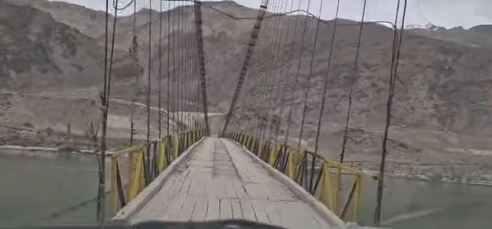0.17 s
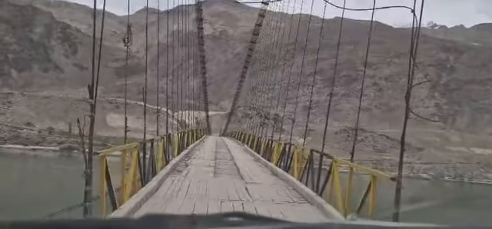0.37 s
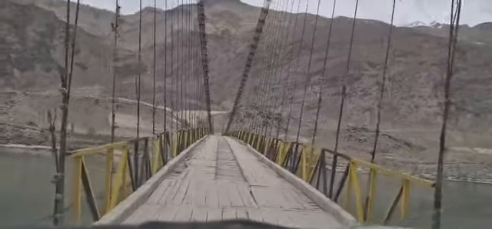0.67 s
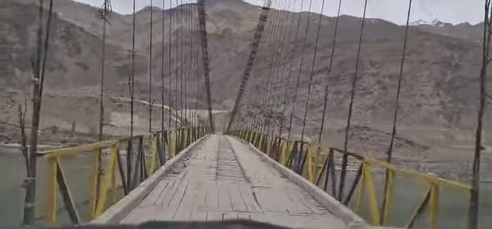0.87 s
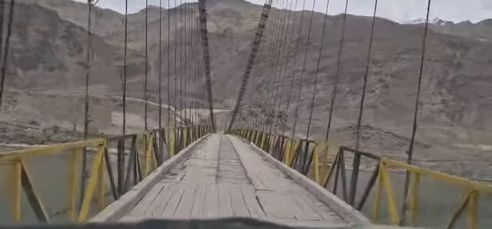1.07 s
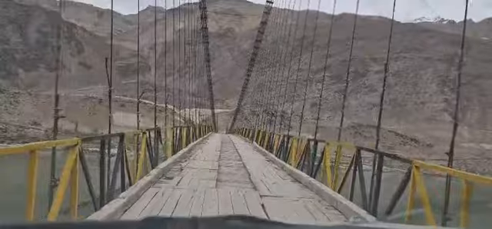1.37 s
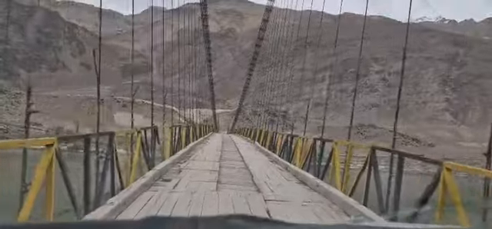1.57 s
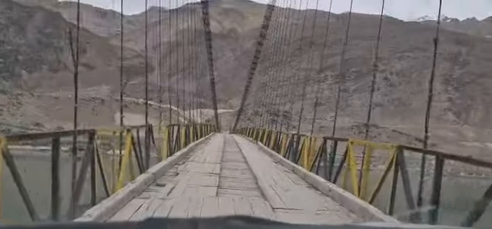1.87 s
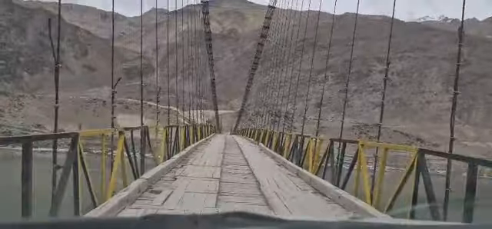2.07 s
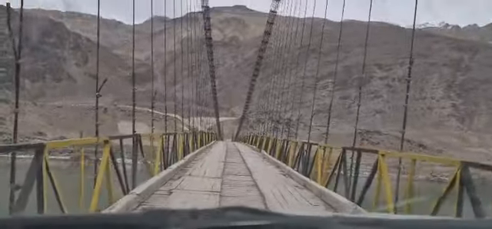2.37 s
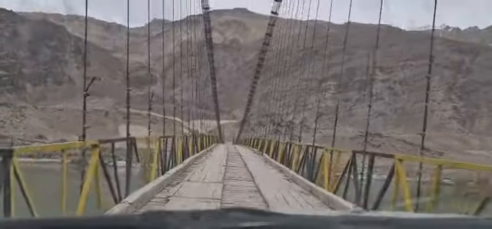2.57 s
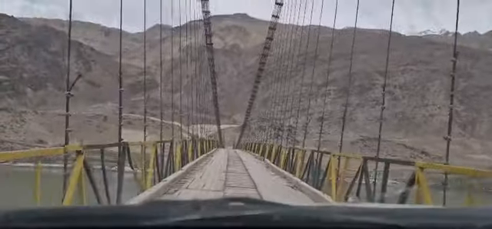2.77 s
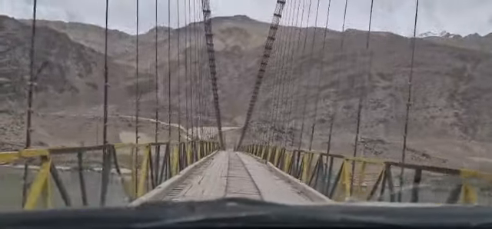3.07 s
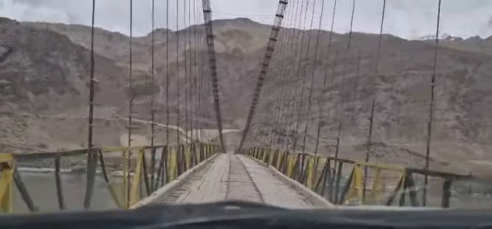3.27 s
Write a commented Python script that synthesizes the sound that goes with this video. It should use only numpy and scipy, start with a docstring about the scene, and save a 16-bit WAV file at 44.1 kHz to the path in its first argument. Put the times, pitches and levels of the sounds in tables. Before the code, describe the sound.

Car interior crossing a plank bridge: deep tyre rumble, engine drone, hollow board bumps and rattles

```python
"""A car creeps over a plank suspension bridge, heard from inside the cabin.
All along, the engine drones low (sines) and the tyres rumble on the boards (shaped noise).
At first an airy hiss is strong and the trim squeaks (gliding tones); then planks knock and thump (ringing tones).
Midway the hiss fades, then a cluster of thumps and bumps comes with a rattle (noise clacks).
After a calmer stretch come more jolts, rattles and one deep boom; small ticks and creaks (noise) dot the ride."""
import sys
import numpy as np
from scipy import signal
from scipy.fft import rfft, irfft
from scipy.io import wavfile

SR = 44100
rng = np.random.default_rng(int(sys.argv[2]) if len(sys.argv) > 2 else 0)


def to_wav(sig):
    """Store sig (one row per channel, or 1-D mono) as 16-bit WAV at the path in sys.argv[1].

    Samples outside -1..1 are clipped; the rate is SR.
    """
    pcm = np.clip(np.atleast_2d(sig), -1, 1) * 32767
    pcm = np.round(pcm).astype(np.int16)
    wavfile.write(sys.argv[1], SR, pcm.T)  # frames by channels


N = 150822
TIME = np.arange(N) / SR

# In every noise colour below, levels are relative: the finished noise is scaled to rms 1.
# engine firing rate: t/s, f/Hz
FIRING_RATE = [(0, 36.61), (1.85, 36.99), (2.88, 36.65), (3.42, 37.03)]
# drone at the firing rate itself: t/s, level/dB
DRONE_LEVEL = [(0, -23.5), (.1, -30), (.24, -20), (.34, -34), (.52, -23), (.64, -24.5), (.8, -31.5),
               (.93, -22), (1.01, -29), (1.1, -22), (1.3, -34.5), (1.39, -23.5), (1.55, -24.5), (1.7, -24),
               (1.92, -25.5), (2.14, -20.5), (2.22, -28.5), (2.44, -21), (2.67, -24), (2.9, -26.5),
               (3.1, -17), (3.42, -30)]
DRONE_WAVER_DB, DRONE_WAVER_RAD = 2, 0.44
# engine overtones: multiple of the firing rate, level/dB, left minus right/dB
ENGINE_ORDERS = [(2, -35.5, 0), (3, -38, -4), (4, -47.5, 5), (5, -43.5, -1), (6, -47, -0.5),
                 (7, -57.5, -16), (8, -51.5, -3), (9, -48, 5.5), (10, -48.5, 7.5), (11, -57, -2),
                 (12, -62, 2), (13, -60, -10)]
ORDER_WAVER_DB, ORDER_WAVER_RAD = 3, 0.52
# colour of the deep tyre rumble: f/Hz, level/dB
RUMBLE_COLOUR = [(10, -46), (20, -19), (30, -15), (42, 0), (51, 3), (62, 3), (76, 5.5), (105, -2),
                 (130, -9), (200, -33.5), (400, -50), (1000, -85.5)]
# how loud the rumble is: t/s, level/dB
RUMBLE_LEVEL = [(0, -22), (.15, -22), (.3, -26.5), (.5, -25), (.72, -38), (.85, -28), (1.1, -27),
                (1.33, -22.5), (1.5, -30.5), (1.83, -27.5), (1.93, -21), (2.03, -24.5), (2.25, -28),
                (2.75, -29), (2.96, -24.5), (3.17, -20), (3.28, -29.5), (3.42, -22.5)]
# colour of the hollow roll of the deck: f/Hz, level/dB
DECK_COLOUR = [(60, -17.5), (110, -3.5), (145, 3), (180, -0.5), (210, -3), (243, 0), (275, -5), (320, -5),
               (380, -7.5), (440, -9.5), (520, -14.5), (760, -22), (1000, -30.5), (2000, -71)]
# how loud the deck is: t/s, level/dB
DECK_LEVEL = [(0, -34), (.3, -33.5), (.7, -36), (.85, -33.5), (1.1, -34.5), (1.3, -34.5), (1.5, -34),
              (1.85, -34.5), (1.89, -30), (1.95, -31), (2.07, -33.5), (2.17, -34.5), (2.45, -36),
              (2.6, -32), (2.85, -36.5), (2.9, -30), (3.0, -28), (3.06, -33), (3.25, -34.5), (3.42, -32.5)]
# colour of tyres scrubbing on dry wood: f/Hz, level/dB
SCRUB_COLOUR = [(200, -59), (500, 0.5), (760, 3.5), (950, -0.5), (1300, 2.5), (1700, -5.5), (2400, -7.5),
                (3000, -10.5), (4200, -13), (7000, -22.5), (10000, -37.5)]
# how loud the scrub is: t/s, level/dB
SCRUB_LEVEL = [(0, -45.5), (.9, -45.5), (1.2, -47.5), (1.6, -48.5), (1.95, -46), (2.25, -48), (2.85, -47),
               (2.96, -45), (3.15, -46.5), (3.42, -48.5)]
# wheels dropping off uneven planks: t/s, level/dB, body pitch f/Hz
THUMPS = [(0.811, -18.5, 67), (1.222, -23, 75), (1.291, -24, 89), (1.733, -17.5, 70.6), (1.888, -13, 75),
          (1.927, -11, 70), (2.954, -13.5, 79), (3.116, -18, 69), (3.168, -17, 74.5)]
# ways the car body rings: multiple of its pitch, level added to the thump/dB, time to fall 60 dB/s
BODY_MODES = [(1, 2.5, 0.15), (1.5, -12.5, 0.21), (2.252, -16, 0.12)]
THUMP_RISE_S = 0.0033
# one deep cabin boom: t/s, level/dB, f/Hz, rise/s, time to fall 60 dB/s
BOOM = (2.995, -10, 35, .03, .3)
# boards bumping on their beams: t/s, level/dB, pitch f/Hz
BUMPS = [(.661, -24.5, 190), (0.799, -24, 237), (1.065, -30, 148), (1.225, -23.5, 193), (1.306, -23.5, 190),
         (1.876, -21, 224), (1.901, -16, 152.5), (1.91, -17.5, 235), (2.051, -25, 204), (2.528, -28, 159),
         (2.647, -27.5, 155), (2.892, -22.5, 235), (2.918, -22, 200), (2.965, -24, 239), (3.001, -22, 215),
         (3.051, -27, 240), (3.12, -26, 189), (3.149, -27, 136)]
# ways a board rings: multiple of its pitch, level added to the bump/dB, time to fall 60 dB/s
BOARD_MODES = [(0.999, -1.5, 0.12), (1.421, -7.5, 0.11), (1.85, -12, 0.039), (3.1, -27.5, 0.057)]
BUMP_RISE_S = 0.004
# loose planks knocking: t/s, level/dB, time for the clack to fall 60 dB/s, treble limit f/Hz
KNOCKS = [(.7965, -23, .052, 6000), (1.292, -33, .08, 1900), (1.8085, -33.5, .06, 1800),
          (2.921, -41, .1, 2400)]
# colour of a plank's clack: f/Hz, level/dB
PLANK_COLOUR = [(100, -4), (220, 6), (400, 2), (600, 0), (750, 0), (1000, 0), (1350, 1), (1700, -5),
                (2400, -6), (3100, -9), (3600, -18), (4300, -13), (5000, -17), (7500, -22), (10000, -37),
                (16000, -40)]
# woody ring of a knocked plank: f/Hz, level added to the knock/dB, time to fall 60 dB/s
PLANK_RING = [(596, -10, 0.015), (762, -10, 0.042), (1345, -12, 0.069)]
KNOCK_RISE_S, KNOCK_HOLD_S = 0.001, 0.005
# fittings rattling after a jolt: t/s, length/s, level/dB
RATTLES = [(1.887, .19, -45.5), (2.921, .035, -38), (2.97, .06, -43), (3.058, .12, -46)]
# colour of a rattle: f/Hz, level/dB
RATTLE_COLOUR = [(300, -11), (700, 7.5), (1300, 4), (1650, 2), (2150, 0.5), (3000, -11.5), (4500, -6),
                 (7500, -16), (10000, -32.5)]
RATTLES_PER_S, RATTLE_T60_S, RATTLE_SETTLE_DB, RATTLE_SPREAD_DB = 70, 0.035, -4, 3
# trim and grit ticking: t/s, level/dB, centre f/Hz, width/octaves, left minus right/dB
TICKS = [(.492, -52, 9000, .5, -2), (.661, -42, 1890, 1.3, 0), (0.862, -38.5, 6500, 0.3, -2),
         (0.887, -47, 6660, 0.29, -2), (.946, -40, 7000, 0.4, -2), (.948, -45, 13000, .3, -4),
         (1.425, -47, 8400, 0.31, -1), (1.895, -52, 5500, 0.42, -1), (1.926, -44.5, 4700, 0.5, 0),
         (2.004, -47, 3800, 0.58, -5), (2.494, -46, 4570, 0.44, 3), (2.547, -46.5, 4800, 0.47, 1),
         (2.781, -39.5, 2700, 0.74, -2), (2.831, -57, 6500, 1.2, 4), (2.922, -42, 2000, 0.23, 7),
         (2.928, -47, 4800, 0.53, -2), (3.113, -50, 4960, 0.48, 1), (3.132, -49, 5460, 0.35, -4),
         (3.163, -42.5, 2900, 0.84, 1)]
TICK_RISE_S, TICK_T60_S = 0.00091, 0.032
# trim squeaks: t/s, length/s, level/dB, start f/Hz, end f/Hz
SQUEAKS = [(0.071, 0.044, -57, 6750, 6500), (0.274, 0.038, -56, 4790, 4720),
           (0.3, 0.023, -53.5, 4480, 4380), (0.322, 0.03, -48, 4250, 4200),
           (3.016, 0.072, -56.5, 6120, 6020), (3.127, 0.022, -54, 4190, 4160)]
SQUEAK_JITTER, SQUEAK_JITTER_HZ = 0.028, 700  # rms share of the pitch, speed of the wander
# colour of faint trim creaks: f/Hz, level/dB
CREAK_COLOUR = [(1200, -19), (2500, -11.5), (4400, 0), (6500, -2), (8300, -3), (10000, -21), (16000, -19)]
CREAK_DB, CREAKS_PER_S, CREAK_SPREAD_DB, CREAK_T60_S = -8.5, 46, 0.5, 0.078  # CREAK_DB: against the hiss
# colour of the airy hiss: f/Hz, level/dB
HISS_COLOUR = [(1000, 4.5), (2400, 2), (3200, 0.5), (3800, -3), (4300, 4), (4900, -3.5), (6200, -2.5),
               (7000, -7), (8000, -4.5), (9200, -28), (10500, -37.5), (16000, -31.5)]
# how loud the hiss is: t/s, level/dB
HISS_LEVEL = [(0, -47), (.2, -47.5), (.8, -46.5), (1.0, -47.5), (1.15, -46), (1.65, -53.5), (2.05, -56),
              (2.35, -59), (2.87, -56.5), (3.0, -57), (3.13, -51), (3.23, -57.5), (3.42, -54.5)]
# colour of the top of the hiss: f/Hz, level/dB
FIZZ_COLOUR = [(5000, 1), (7800, 10.5), (9000, 1), (10200, -3.5), (11800, 4.5), (14000, 2), (16000, -1)]
# how loud that top is: t/s, level/dB
FIZZ_LEVEL = [(0, -48.5), (.15, -58), (.5, -55.5), (.85, -55.5), (1.05, -57.5), (1.15, -55.5), (1.3, -60.5),
              (1.5, -58.5), (1.8, -66), (1.87, -75), (1.94, -66), (2.06, -86), (2.4, -82), (2.85, -71.5),
              (2.95, -60.5), (3.07, -66), (3.17, -67), (3.3, -71), (3.42, -68)]
# how alike left and right are in the cabin: f/Hz, likeness (held between -0.999 and 0.999 in use)
LIKENESS = [(60, 1.5), (160, 4.5), (330, 0.5), (470, -0.5), (620, 0.03), (790, 0.5), (950, -0.29),
            (1150, -0.76), (1480, -0.4), (1750, -0.32), (2200, 0.38), (2900, -0.38), (4500, 0), (15000, 0)]
# left-right balance in the cabin: f/Hz, left minus right/dB
BALANCE = [(60, 0.5), (160, 3), (370, 5.5), (480, -2), (800, 0.5), (1300, 2.5), (1650, -2.5), (3000, -0.5),
           (4000, -3), (5700, -5.5), (7000, -1.5), (8200, 1.5), (9400, 5), (10500, -3.5), (12500, 0),
           (16000, -4)]
EDGE_HZ = 15850


def amp(db):
    """Turns decibels into a gain."""
    return 10 ** (np.asarray(db) / 20)


def unit(x):
    """Scales a sound to rms 1."""
    return x / np.sqrt(np.mean(x ** 2) + 1e-20)


def curve(points):
    """Joins timed points into a control curve over the whole scene."""
    return np.interp(TIME, *np.transpose(points))


def at_hz(points, hz):
    """Reads a table between its points on a log-frequency axis."""
    f, value = np.transpose(points)
    return np.interp(np.log(hz + 1), np.log(f + 1), value)


def pan(db):
    """Gives left and right gains that differ by db; above zero leans left."""
    return amp(np.array([[.5], [-.5]]) * db)


def add(mix, s, sound):
    """Adds a sound to the mix at time s, cut off at the end of the scene."""
    part = mix[:, max(round(s * SR), 0):][:, :sound.shape[-1]]
    part += sound[..., :part.shape[1]]


def drift(rate_hz):
    """A random wander of rms 1, with little movement faster than rate_hz."""
    hz = np.fft.rfftfreq(N, 1 / SR)
    keep = (hz > 0) / (1 + (hz / rate_hz) ** 4)
    return unit(irfft(rfft(rng.standard_normal(N)) * keep, N))


def cabin_noise(colour, size=N):
    """Coloured noise, spread left to right as the cabin does at each frequency."""
    hz = np.fft.rfftfreq(size, 1 / SR)
    common, apart = rfft(rng.standard_normal((2, size)))
    same = np.clip(at_hz(LIKENESS, hz), -.999, .999)
    # the apart noise has opposite signs left and right
    pair = np.sqrt(1 + same) * common + np.array([[1], [-1]]) * np.sqrt(1 - same) * apart
    gain = amp(at_hz(colour, hz)) * pan(at_hz(BALANCE, hz))
    return unit(irfft(pair * gain, size))


def strike(t, rise, t60):
    """The loudness shape of a hit: quick rise, then a fall of 60 dB in t60 seconds."""
    fall = np.exp(-np.log(1000) * np.maximum(t - rise, 0) / t60)
    return np.minimum(t / rise, 1) * fall


def engine():
    """A deep drone at the firing rate and its overtones, wavering as the car rocks."""
    turn = 2 * np.pi * np.cumsum(curve(FIRING_RATE)) / SR
    drone_level = amp(curve(DRONE_LEVEL) + DRONE_WAVER_DB * drift(rate_hz=16))
    drone = drone_level * np.sin(turn + DRONE_WAVER_RAD * drift(rate_hz=6.2))
    out = np.array([drone, drone])
    for order, db, side_db in ENGINE_ORDERS:
        start = 2 * np.pi * rng.random()
        phase = order * turn + start + ORDER_WAVER_RAD * drift(rate_hz=3.07)
        level = amp(db + ORDER_WAVER_DB * drift(rate_hz=4.4))
        out += pan(side_db) * level * np.sin(phase)
    return np.sqrt(2) * out  # makes the levels rms rather than peak


def tyres(judder_db=1.07, deck_db=1.35, grain_db=0.37):
    """Tyres excite deep rumble, hollow deck and dry scrub, all juddering together over the boards."""
    judder = drift(rate_hz=26.6)
    rumble = cabin_noise(RUMBLE_COLOUR) * amp(curve(RUMBLE_LEVEL) + judder_db * judder)
    deck = cabin_noise(DECK_COLOUR) * amp(curve(DECK_LEVEL) + deck_db * judder)
    scrub = cabin_noise(SCRUB_COLOUR) * amp(curve(SCRUB_LEVEL) + grain_db * judder)
    return rumble + deck + scrub


def thumps():
    """Each drop of a wheel rings the low modes of the body; one separate deep cabin boom swells late."""
    out, t = np.zeros((2, N)), np.arange(SR // 2) / SR
    for s, db, pitch_hz in THUMPS:
        for ratio, mode_db, t60 in BODY_MODES:
            hz = pitch_hz * ratio
            ring = strike(t, THUMP_RISE_S, t60) * np.sin(2 * np.pi * hz * t)
            add(out, s, amp(db + mode_db) * pan(at_hz(BALANCE, hz)) * ring)
    s, db, hz, rise, t60 = BOOM
    add(out, s, amp(db) * strike(t, rise, t60) * np.sin(2 * np.pi * hz * t))
    return out


def bumps():
    """Boards flex under a tyre and slap their beams: short, hollow, each at its own pitch."""
    out, t = np.zeros((2, N)), np.arange(SR // 4) / SR
    for s, db, pitch_hz in BUMPS:
        for ratio, mode_db, t60 in BOARD_MODES:
            hz = pitch_hz * ratio
            wave = np.sin(2 * np.pi * (hz * t + rng.random()))
            ring = strike(t, BUMP_RISE_S, t60) * wave
            add(out, s, amp(db + mode_db) * pan(at_hz(BALANCE, hz)) * ring)
    return out


def knocks():
    """Loose boards give a dry clack of noise plus a short woody ring; soft clacks are duller."""
    out, t = np.zeros((2, N)), np.arange(SR // 4) / SR
    ring = np.zeros(len(t))
    for hz, mode_db, ring_t60 in PLANK_RING:
        ring += amp(mode_db) * strike(t, KNOCK_RISE_S, ring_t60) * np.sin(2 * np.pi * hz * t)
    for s, db, t60, top_hz in KNOCKS:
        fall = amp(-60 * np.maximum(t - KNOCK_HOLD_S, 0) / t60)
        shape = np.minimum(t / KNOCK_RISE_S, 1) * fall
        low_pass = signal.butter(2, top_hz, fs=SR)
        clack = signal.lfilter(*low_pass, cabin_noise(PLANK_COLOUR, size=len(t)))
        add(out, s, amp(db) * (shape * clack + ring))
    return out


def rattles():
    """After each big jolt loose fittings chatter in uneven little clacks and settle."""
    out, t = np.zeros((2, N)), np.arange(SR // 20) / SR
    for s, length, db in RATTLES:
        delay = 0
        while delay < length:
            clack = strike(t, TICK_RISE_S, RATTLE_T60_S) * cabin_noise(RATTLE_COLOUR, size=len(t))
            settle_db = RATTLE_SETTLE_DB * delay / length
            uneven_db = RATTLE_SPREAD_DB * rng.uniform(-1.1, 1)
            add(out, s + delay, amp(db + settle_db + uneven_db) * clack)
            delay += (.5 + rng.random()) / RATTLES_PER_S
    return out


def ticks():
    """Trim and grit give small ticks: bursts of noise around one pitch, smeared briefly by the cabin."""
    out, t = np.zeros((2, N)), np.arange(SR // 10) / SR
    hz = np.fft.rfftfreq(len(t), 1 / SR) + 1  # +1 avoids log of zero
    for s, db, centre_hz, octaves, side_db in TICKS:
        colour = np.exp(-.5 * (np.log2(hz / centre_hz) / octaves) ** 2)
        noise = rfft(rng.standard_normal((2, len(t))))
        burst = unit(irfft(noise * colour, len(t)))
        add(out, s, amp(db) * pan(side_db) * strike(t, TICK_RISE_S, TICK_T60_S) * burst)
    return out


def squeaks(side_db=-2):
    """Trim sticks and slips: short falling tones of unsteady pitch that swell and fade."""
    out = np.zeros((2, N))
    for s, length, db, start_hz, end_hz in SQUEAKS:
        u = np.arange(0, 1, 1 / (length * SR))  # progress from 0 to 1
        jitter = SQUEAK_JITTER * drift(rate_hz=SQUEAK_JITTER_HZ)[:len(u)]
        hz = (start_hz + (end_hz - start_hz) * u) * (1 + jitter)
        tone = np.sin(np.pi * u) * np.sin(2 * np.pi * np.cumsum(hz) / SR)
        add(out, s, np.sqrt(2) * amp(db) * pan(side_db) * tone)
    return out


def creaks():
    """Faint slips of the trim at random moments, each a decaying swell of noise."""
    extra_db = CREAK_SPREAD_DB * np.minimum(rng.exponential(1, N), 2)
    slips = (rng.random(N) < CREAKS_PER_S / SR) * amp(extra_db)
    one_slip = strike(np.arange(SR // 10) / SR, TICK_RISE_S, CREAK_T60_S)
    shape = signal.oaconvolve(slips, one_slip)[:N]
    return amp(curve(HISS_LEVEL) + CREAK_DB) * shape * cabin_noise(CREAK_COLOUR)


def air(flutter_db=0.84):
    """Airy noise from outside in two bands, hiss and its top, lightly fluttering together."""
    hiss = cabin_noise(HISS_COLOUR) * amp(curve(HISS_LEVEL))
    fizz = cabin_noise(FIZZ_COLOUR) * amp(curve(FIZZ_LEVEL))
    return (hiss + fizz) * amp(flutter_db * drift(rate_hz=28))


def scene():
    """Adds up everything heard in the cabin."""
    car = engine() + tyres()
    jolts = thumps() + bumps() + knocks() + rattles()
    trim = ticks() + squeaks() + creaks()
    return car + jolts + trim + air()


def record(dry):
    """Removes the very highest treble, above EDGE_HZ, with a steep low-pass filter."""
    low_pass = signal.firwin(511, EDGE_HZ, window=("kaiser", 9), fs=SR)
    return signal.oaconvolve(dry, low_pass[None], "same")


dry = scene()
out = record(dry)
to_wav(out)
```